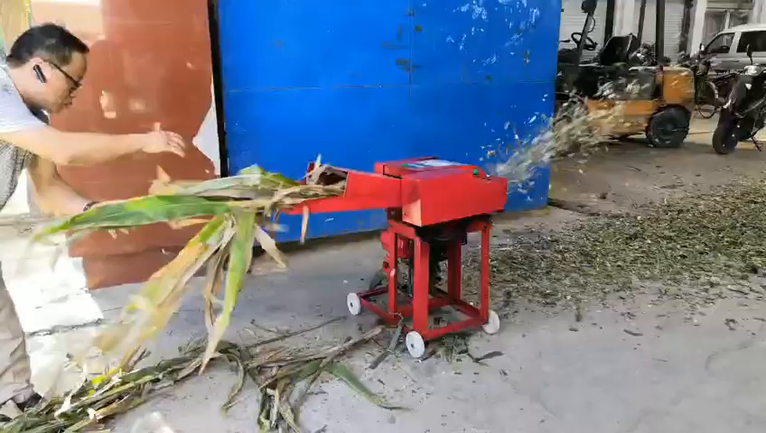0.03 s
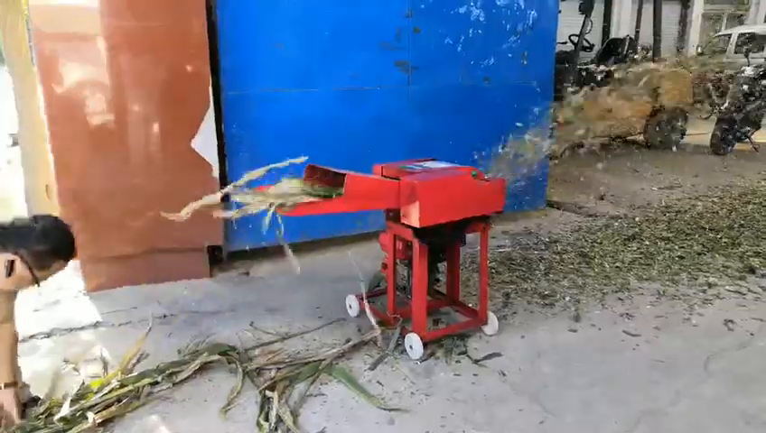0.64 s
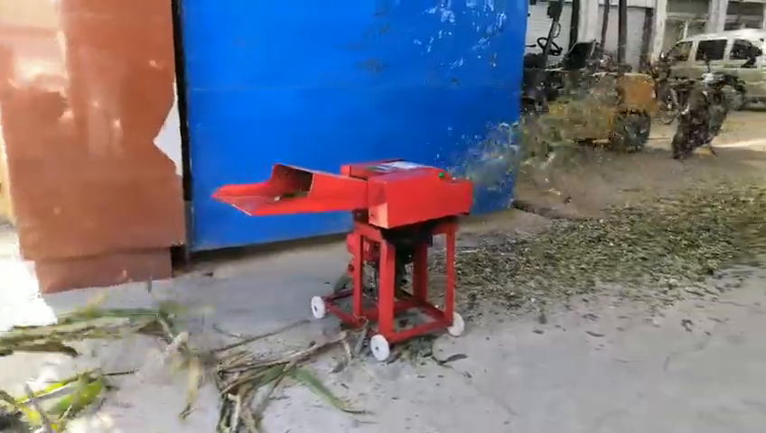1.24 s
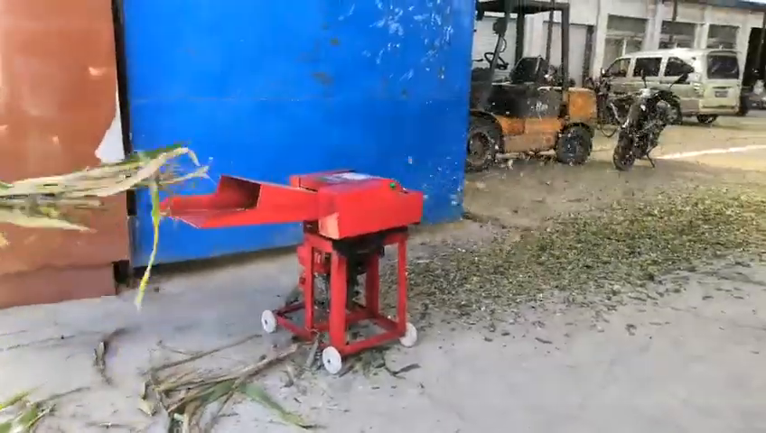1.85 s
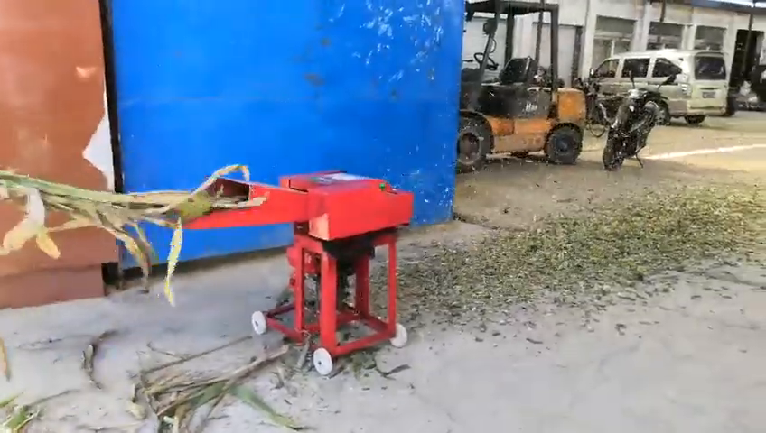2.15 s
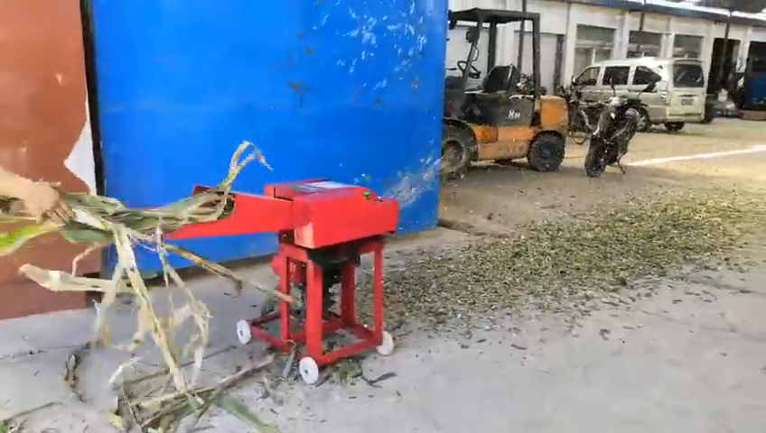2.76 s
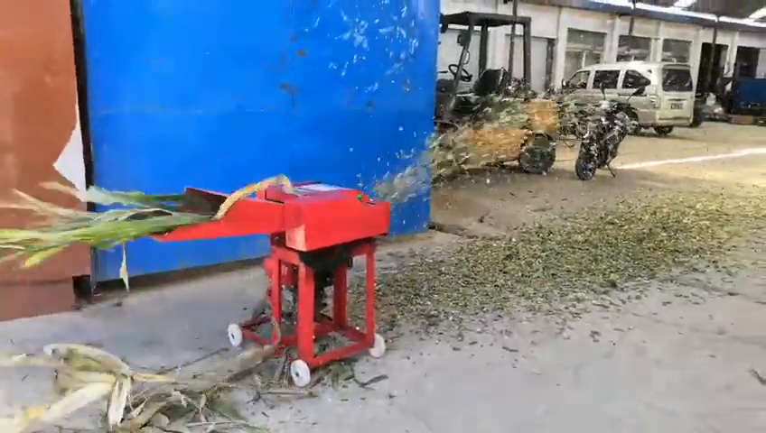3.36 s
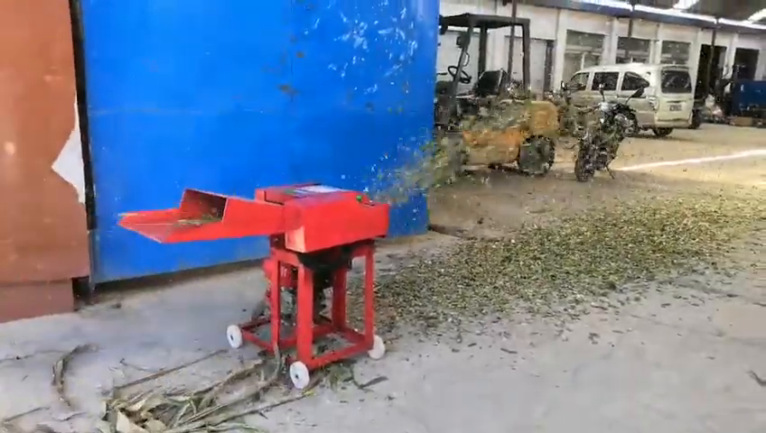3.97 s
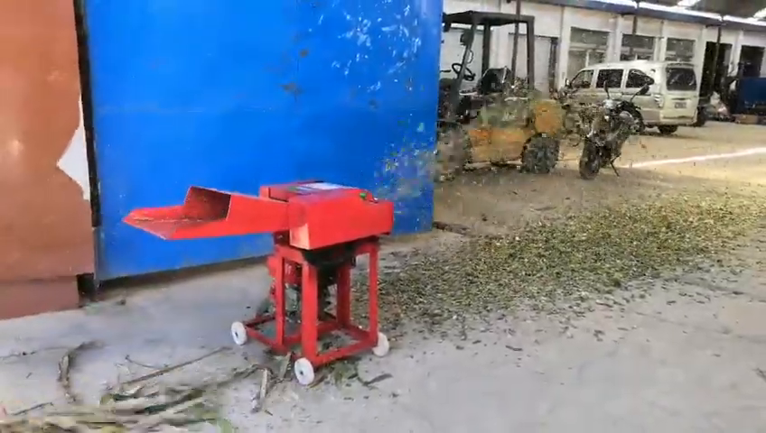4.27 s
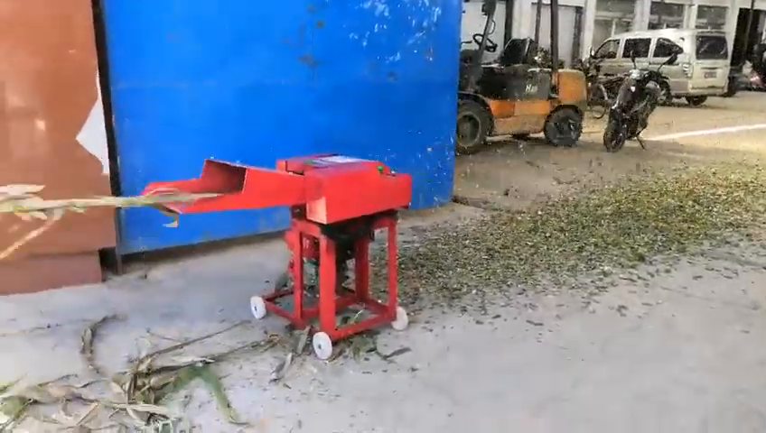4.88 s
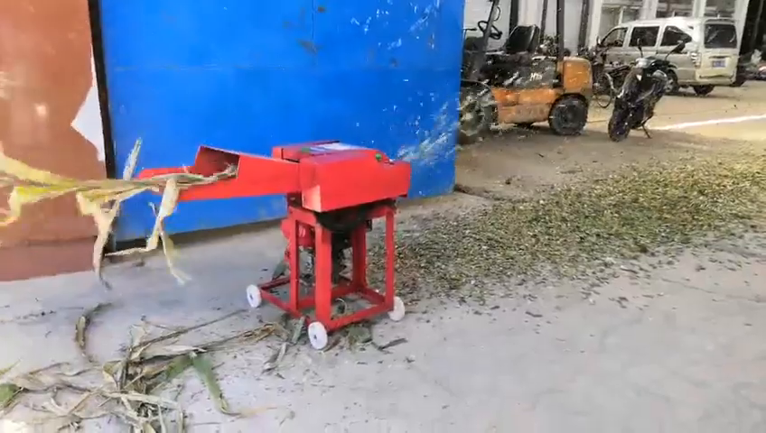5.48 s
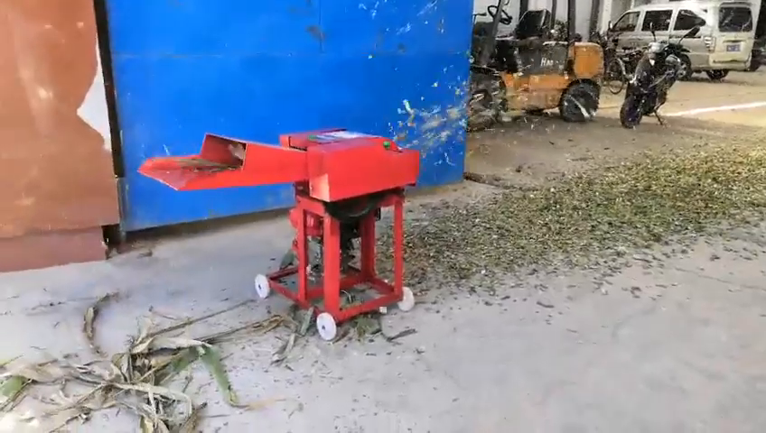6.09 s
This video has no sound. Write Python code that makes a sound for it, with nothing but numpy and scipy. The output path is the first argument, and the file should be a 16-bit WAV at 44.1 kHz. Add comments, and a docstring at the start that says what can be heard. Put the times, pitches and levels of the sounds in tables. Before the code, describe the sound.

A small motorised chaff cutter runs close by in a paved yard, its motor throbbing and its steel housing droning and clattering. Three bundles of maize stalks go through in turn. Each brings a buzzing roar of fast chopping, with woody cracks, knocks and a hiss of flying chaff, while the motor sags slightly. Between bundles the machine eases back to its empty drone.

```python
"""A small motorised chaff cutter in a paved yard, close on a two-port stereo microphone.
Three bundles of maize stalks go in. The belt-driven knives chop about eighty times a second,
whining in leafy tops and groaning in thick ends, while stalks split and hard pieces knock.
Chaff sprays hissing out of the steel chute, and the motor throbs and sags under each bundle.
Behind it all the steel housing drones and clatters, even when the cutter runs empty."""
import sys
import numpy as np
from scipy import signal
from scipy.fft import rfft, irfft
from scipy.io import wavfile
from scipy.ndimage import uniform_filter1d

SR = 44100
rng = np.random.default_rng(int(sys.argv[2]) if len(sys.argv) > 2 else 0)


def wav_out(sig):
    """Save sig, one row per channel (or a flat mono array), as 16-bit PCM at SR to the path in sys.argv[1]."""
    wavfile.write(sys.argv[1], SR, np.round(np.clip(np.atleast_2d(sig).T, -1, 1) * 32767).astype(np.int16))


N = 270333
T = np.arange(N) / SR
BINS_HZ = np.maximum(np.fft.rfftfreq(N, 1 / SR), 1)

# bundles going in; the short ones are leaf tips or an extra burst of chaff hiss within a bundle:
# start_s, length_s, chop_db, spray_db
BUNDLES = [(0.168, 0.79, -19.5, -23.5), (1.997, 0.19, -30, -27.5), (2.542, 1.22, -21, -26.5),
           (2.64, 0.38, -30, -26), (3.983, 0.17, -35, -28), (4.995, 0.77, -25, -25.5),
           (5.827, 0.24, -28, -26)]
# speed of the knives: time_s, cuts_per_s
CUT_RATE = [(0.32, 77.9), (0.48, 78.3), (0.6, 80), (0.78, 81), (1.15, 81.6), (2.0, 81.4), (2.35, 82.1),
            (2.55, 81.4), (2.74, 76.9), (2.92, 79.1), (3.27, 78.8), (3.55, 80.4), (3.8, 81.2), (4.08, 81.1),
            (4.35, 82.5), (5.0, 81.2), (5.7, 81.2), (6.13, 82)]
# leafy tops cut cleanly, hard ends shatter: time_s, cleanness (0-1)
CLEAN_CUT = [(0.32, .65), (0.6, .9), (1.15, .9), (1.4, .4), (2.7, .6), (3.2, .55), (3.5, .9), (4.1, .9),
             (4.4, .35), (6.1, .55)]
# roar of the chopping: frequency_hz, level_db
CHOP_SPECTRUM = [(350, -57), (560, -3), (800, -2), (950, 4), (1200, 1), (1500, 3.5), (2100, 6.5),
                 (2800, -1.5), (3600, -4.5), (5200, -23), (7000, -23), (14000, -47)]
# stalks lying solidly under the knives, so that the cuts buzz: start_s, length_s, level_db
GRIPS = [(0.28, 0.27, -19), (0.76, 0.11, -23.5), (2.7, 0.24, -24.5), (3.16, 0.36, -25), (3.64, 0.18, -19),
         (3.86, 0.2, -26.5)]
# that low buzz: multiple of the cut rate, level_db
BUZZ_ORDERS = [(2, -16), (3, -4.5), (4, 0)]
# leafy tops and thick ends passing the knives: start_s, length_s, level_db
LEAFY_TOPS = [(0.5, 0.6, -35), (2.03, 0.35, -43), (3.33, 0.7, -35.5)]
THICK_ENDS = [(0.25, 0.28, -36), (2.64, 0.62, -35), (5.08, 0.7, -43)]
# the whine in the tops and the groan in the ends: frequency_hz, level_db
WHINE_SPECTRUM = [(400, 0), (480, -1), (560, -1), (645, -5), (730, -5), (800, -5), (890, -8), (970, -4),
                  (1050, -9), (1220, -8), (1300, -0.5), (1400, -9)]
GROAN_SPECTRUM = [(400, -14), (560, -8), (630, -3), (705, 0), (790, -1.5), (870, -9), (1020, -3),
                  (1100, -3), (1180, 0), (1260, -8), (1450, -10)]
# knots in the stalks: time_s, level_db
KNOTS = [(0.78, -23), (2.72, -20.5), (3.19, -21), (3.41, -24), (3.52, -20.5), (3.68, -19), (3.86, -21.5),
         (5.15, -19), (5.24, -20), (5.48, -24), (5.56, -21), (5.71, -19)]
# their rasp: frequency_hz, level_db
RASP_SPECTRUM = [(500, -29), (1100, -1), (1550, 2), (1850, 0), (2250, 8), (2600, -5), (3600, -9),
                 (6000, -42), (12000, -53)]
# thick stalks splitting: start_s, length_s, level_db
SPLITS = [(0.39, 0.071, -34), (1.724, 0.015, -30), (2.355, 0.015, -29), (2.512, 0.022, -26.5),
          (2.67, 0.18, -30), (2.712, 0.025, -20.5), (2.835, 0.035, -30), (2.92, 0.17, -24.5),
          (3.18, 0.053, -31), (3.53, 0.022, -24), (3.586, 0.014, -29), (3.643, 0.018, -30),
          (4.139, 0.014, -32), (4.464, 0.014, -31), (4.66, 0.02, -32), (4.759, 0.013, -32),
          (4.903, 0.014, -32), (5.155, 0.044, -23.5), (5.23, 0.033, -31), (5.336, 0.011, -25),
          (5.56, 0.04, -27), (5.685, 0.094, -27), (5.901, 0.015, -27)]
# resonances of a hollow stalk: pitch_hz, width_hz, level_db
STALK_MODES = [(820, 110, -2), (1170, 200, 1), (2750, 700, 4), (3750, 800, 4), (5300, 1100, -2)]
# hard pieces hitting the housing: start_s, level_db, pitch_hz
KNOCKS = [(2.742, -22, 1150), (2.848, -21, 1140), (3.008, -23.5, 1140), (3.203, -25, 800),
          (3.457, -25.5, 820), (4.065, -25, 1290), (4.118, -28, 780), (4.503, -25.5, 760),
          (5.191, -25, 1200), (5.244, -27, 800), (5.5, -25, 980)]
# hiss of flying chaff: frequency_hz, level_db
SPRAY_SPECTRUM = [(1500, 10), (3000, 5), (5000, 6.5), (6400, -0.5), (7500, 1.5), (8300, -3), (9300, 2.5),
                  (10200, 1), (11500, -9), (13000, -12), (15000, -28)]
# peaks and notches of the chute: centre_hz, width_hz, gain_db
CHUTE_BANDS = [(1830, 160, 1), (2700, 150, 1.5), (3000, 140, 2), (3280, 250, -2), (3780, 250, 2),
               (4030, 120, -1.5), (4420, 250, -2.5), (5050, 200, 1), (5800, 280, 4), (7550, 400, 1.5),
               (8200, 300, -2)]
# motor speed, sagging under the bundles: time_s, cycles_per_s
MOTOR_SPEED = [(0.32, 28.42), (0.48, 28.58), (0.75, 29.32), (1.52, 29.57), (1.92, 29.29), (2.43, 29.65),
               (2.74, 28.24), (2.96, 28.85), (3.27, 28.72), (3.75, 29.43), (4.02, 29.26), (4.41, 29.83),
               (5.04, 29.09), (5.19, 29.33), (6.13, 29.5)]
# throb of the motor and shake of its frame: multiple of the cycle rate, level_db
THROB_ORDERS = [(5, -6.5), (6, 1), (7, -17), (8, -41), (9, -12.5), (10, -12), (11, -11), (12, -17.5),
                (13, -46)]
SHAKE_ORDERS = [(1, -19), (2, -1), (3, -11.5), (4, -49), (7, 0)]
# drone of the housing: frequency_hz, level_db
DRONE_SPECTRUM = [(25, -30), (90, -15), (120, -27), (160, 0), (215, -19), (240, 3.5), (262, 3), (278, -3.5),
                  (300, 6.5), (335, 1.5), (358, -6), (390, -13.5), (500, -25), (900, -76)]
# the drone swells briefly: time_s, level_db
DRONE_SWELLS = [(0.5, -24), (1.31, -19), (1.64, -19), (1.98, -19), (2.5, -27), (3.74, -39), (4.35, -25),
                (4.5, -19.5), (4.86, -21.5), (5.08, -22), (5.68, -19.5), (6.06, -21)]
# the drone dips briefly: time_s
DRONE_LULLS = [0.69, 1.16, 3.58, 4.24, 5.29, 5.47, 5.9]
# ringing steel panels: pitch_hz, width_hz, level_db
PANEL_MODES = [(407, 14, -16), (648, 18, -8), (797, 30, -4.5), (1100, 24, -4), (1178, 30, 0),
               (1297, 28, -1.5), (1625, 30, -6), (1690, 35, -4), (1780, 40, -3), (1875, 55, -1.5),
               (2010, 50, -1.5), (2120, 45, -1.5), (2290, 60, -4), (3030, 70, -9)]
# rattle of gears and feed rollers: frequency_hz, level_db
CLATTER_SPECTRUM = [(300, 4), (420, -3.5), (700, -0.5), (1200, 0), (2000, 1.5), (2600, -3.5), (3300, -7),
                    (5000, -11), (6300, -19), (8200, -22), (9800, -18), (11500, -31.5), (15000, -52)]
# thin steel ring, relative to that rattle: time_s, level_db
RING_LEVEL = [(0.4, -21), (0.9, -27), (1.3, -19), (1.9, -24), (2.9, -16), (3.9, -27), (4.3, -18.5),
              (5.0, -19.5), (5.6, -14), (6.1, -22)]
# the two microphone ports: frequency_hz, likeness (0-1), left_lead_rad, left_minus_right_db
MIC_PORTS = [(58, 0.9, -0.12, 0), (177, 0.93, -0.62, 0), (333, 0.54, -0.46, 0), (466, 0.98, -1.1, -1.5),
             (500, 1, -1.72, -2.5), (775, 0.05, 0.52, 2), (1300, 0.88, 0.37, 0), (1600, 0.43, 0.74, -3),
             (2280, 0.52, 1.5, 2), (3650, 0.17, 1.13, 1.5), (6540, 0, 0.8, -2.5), (9160, 0.01, -0.28, -1),
             (10400, 0, -0.17, 8), (14000, .02, 0, 0)]

EMPTY_CHOP_DB, EMPTY_SPRAY_DB = -27, -36.5   # scraps left whirling in the housing
FULL_LOAD_DB, FULL_BUZZ_DB = -17.5, -13   # chopping and buzz levels that count as full load
SPRAY_LINGER = 1.335   # chaff flies for this many times a bundle's length


def chopping(cuts, panel_db=-2.5):
    """The cutting roars in the housing and sets its panels ringing."""
    cleanness, = in_time(CLEAN_CUT)
    roar = colour(knife_hits(cuts, cleanness), CHOP_SPECTRUM)
    return roar + from_db(panel_db) * resonances(knife_hits(cuts, cleanness), PANEL_MODES)


def knife_hits(cuts, cleanness):
    """Each knife cracks through the stalks and pieces tumble in between."""
    cracks = strokes(cuts, decay_turns=.49, uneven_db=1) * rng.standard_normal((2, N))
    tumble = impacts(per_s=1100, spread_db=1, ring_s=.0015)
    return cleanness * cracks + np.sqrt(1 - cleanness ** 2) * tumble


def feeding(bite_s=.092):
    """Each bundle is drawn in, tapers and runs out: gains of the chopping, spray and buzz."""
    cutting = [(start, length, db) for start, length, db, _ in BUNDLES]
    flying = [(start, length * SPRAY_LINGER, db) for start, length, _, db in BUNDLES]
    chop = held_power(cutting, bite_s, release_db_per_s=21, thinning_db_per_s=3.5)
    chop += from_db(EMPTY_CHOP_DB) ** 2
    chaff = held_power(flying, bite_s, release_db_per_s=58, thinning_db_per_s=.5)
    chaff += from_db(EMPTY_SPRAY_DB) ** 2
    buzz = held_power(GRIPS, attack_s=.042, release_db_per_s=90) + chop * from_db(-12) ** 2
    return np.sqrt([chop, chaff, buzz])


def knife_buzz(cuts, orders):
    """Evenly spaced cuts shake the housing at multiples of their rate, each wavering a little."""
    phase = 2 * np.pi * (cuts + .0012 * drift(14))
    out = 0
    for k, gain in orders:
        waver = from_db(min(.2 * k, 2.5) * drift(4))
        out += gain * waver * np.sqrt(2) * np.cos(k * phase + rng.uniform(0, 2 * np.pi))
    return out


def knife_strain(cuts, cut_rate, events, spectrum, panel_lift=.69):
    """Whine or groan: upper multiples of the cut rate light up as they cross a panel's resonance."""
    points_hz, points_db = np.transpose(spectrum)
    orders = []
    for k in range(5, 19):
        hz = k * cut_rate
        gain = from_db(np.interp(np.log(hz), np.log(points_hz), points_db))
        ringing = sum(1 / (1 + (2 * (hz - centre) / width) ** 2) for centre, width, _ in PANEL_MODES)
        orders.append((k, gain * (1 + panel_lift * ringing)))
    envelope = np.sqrt(held_power(events, attack_s=.08, release_db_per_s=50))
    return envelope * knife_buzz(cuts, orders)


def knot_rasp(cuts):
    """Tough knots rasp briefly against the knives."""
    envelope = np.sqrt(swell_power(KNOTS, width_s=.044))
    return envelope * colour(knife_hits(cuts, cleanness=.5), RASP_SPECTRUM)


def stalk_crunch(cuts):
    """Hollow stalks split with a bright, woody crackle."""
    envelope = np.sqrt(held_power(SPLITS, attack_s=.0033, release_db_per_s=130))
    return envelope * resonances(knife_hits(cuts, cleanness=.33), STALK_MODES)


def knocks(rise_s=.011, reach_octaves=.35):
    """A hard piece tumbles against the housing and rings the panels nearest its own pitch."""
    hz, _, panel_db = np.transpose(PANEL_MODES)
    age = np.arange(SR // 6) / SR
    envelope = age / rise_s * np.exp(1 - age / rise_s)
    out = np.zeros(N + SR)
    for start_s, level_db, pitch_hz in KNOCKS:
        gains = from_db(panel_db) * np.exp(-(np.log2(hz / pitch_hz) / reach_octaves) ** 2)
        tones = np.sin(2 * np.pi * (hz[:, None] * age + rng.random((len(hz), 1))))
        start = int(start_s * SR)
        out[start:start + len(age)] += from_db(level_db) * envelope * rms_one(gains @ tones)
    return out[:N]


def chip_ping(start_s=4.35, pitch_hz=4190, level_db=-22.5, decay_s=.014):
    """One hard chip strikes a steel part with a clear ping."""
    age = np.maximum(T - start_s, 0)
    return from_db(level_db) * np.sin(2 * np.pi * pitch_hz * age) * np.exp(-age / decay_s)


def chaff_spray(cuts):
    """Chips tick against the chute by the thousand, in a puff after each cut."""
    chips = impacts(per_s=1900, spread_db=5, ring_s=.013)
    puffs = np.exp(.16 * strokes(cuts, decay_turns=.58, uneven_db=1.5))
    return colour(chips * puffs, SPRAY_SPECTRUM)


def motor(cycles, orders, uneven_db, crest_turns=.5894):
    """The motor's harmonics swell together once a cycle; the upper ones waver most."""
    phase = 2 * np.pi * (cycles - crest_turns + .003 * drift(22))
    out = 0
    for k, db in orders:
        lag = .16 * (k - 6) ** 2   # away from the main resonance they fall out of step: a rounder throb
        out -= from_db(db + uneven_db * k * drift(7.4)) * np.cos(k * phase - lag)
    return rms_one(out)


def motor_throb(cycles, chop_gain, buzz_gain, recovery_s=.14):
    """The throb eases under a firm cut and under load, which lingers just after a bundle."""
    empty, full = from_db([EMPTY_CHOP_DB, FULL_LOAD_DB])
    load = (chop_gain - empty) / (full - empty)
    load = np.maximum(load, np.interp(T - recovery_s, T, load))
    firmness = (buzz_gain / from_db(FULL_BUZZ_DB)) ** 2
    level_db = -16 - 6.5 * load - 8.5 * firmness
    return from_db(level_db) * motor(cycles, THROB_ORDERS, uneven_db=.11)


def housing_drone(cycles, crest_turns=.4, lull_db=-3, lull_width_s=.041):
    """The steel box drones roughly, pulses with the motor, and now and then swells or dips."""
    base_power = from_db(-22.5 + .3 * drift(4.5)) ** 2
    dips_db = lull_db * sum(np.exp(-((T - s) / lull_width_s) ** 2) for s in DRONE_LULLS)
    envelope = from_db(dips_db) * np.sqrt(base_power + swell_power(DRONE_SWELLS, width_s=.097))
    rough = colour(impacts(per_s=490, spread_db=1.5, ring_s=.0033), DRONE_SPECTRUM)
    levelled = rough / np.sqrt(uniform_filter1d(rough ** 2, size=SR // 7) + 1e-9)
    pulse = 1 + .38 * np.cos(2 * np.pi * (cycles - crest_turns))
    return envelope * rms_one(levelled * pulse)


def gear_clatter(cycles):
    """Gears and feed rollers rattle and stir the panels; one steel part is tapped and rings."""
    rattle = impacts(per_s=1200, spread_db=2, ring_s=.006) * (1 + .015 * np.cos(2 * np.pi * cycles))
    panels = resonances(impacts(per_s=720, spread_db=4, ring_s=.0026), PANEL_MODES)
    ring = resonate(impacts(per_s=150, spread_db=1.5, ring_s=.004), hz=4192, width_hz=42)
    ring_db, = in_time(RING_LEVEL)
    return colour(rattle, CLATTER_SPECTRUM) + from_db(-9) * panels + from_db(ring_db) * ring


def chute(x):
    """The noise leaves through the steel chute, which adds its own peaks and notches."""
    bands = sum((from_db(db) - 1) / (1 + 2j * (BINS_HZ - hz) / width) for hz, width, db in CHUTE_BANDS)
    return irfft(rfft(x) * (1 + bands), N)


def microphone(direct, scattered):
    """Direct sound is common to both ports; scattered sound differs between them, most in the treble."""
    likeness, lead_rad, balance_db = in_frequency(MIC_PORTS)
    sides = np.array([[1], [-1]])
    mid, side = rfft(scattered)
    pair = rfft(direct) + np.sqrt((1 + likeness) / 2) * mid + sides * np.sqrt((1 - likeness) / 2) * side
    return irfft(pair * from_db(sides * balance_db / 2) * np.exp(.5j * sides * lead_rad), N)


def impacts(per_s, spread_db, ring_s):
    """Random hits of uneven size, each a short scatter of reflections, along two paths; rms 1."""
    sizes = from_db(spread_db * np.minimum(rng.exponential(1, N), 4))
    hits = (rng.random(N) < per_s / SR) * sizes
    energy = signal.lfilter([1], [1, -np.exp(-1 / (ring_s * SR))], hits ** 2 + 1e-18)
    return rms_one(np.sqrt(energy) * rng.standard_normal((2, N)))


def strokes(turns, decay_turns, uneven_db):
    """A sharp rise and a decay once a turn, no two equally strong; rms 1."""
    strength = from_db(uneven_db * rng.standard_normal(1000))
    return rms_one(strength[turns.astype(int)] * np.exp(-(turns % 1) / decay_turns))


def held_power(events, attack_s, release_db_per_s, thinning_db_per_s=0):
    """Summed power of events that rise, hold while thinning, and die away."""
    power = 0
    for start_s, length_s, level_db in events:
        age = T - start_s
        thinned_db = thinning_db_per_s * np.clip(age, 0, length_s)
        released_db = release_db_per_s * np.maximum(age - length_s, 0)
        power += (np.clip(age / attack_s, 0, 1) * from_db(level_db - thinned_db - released_db)) ** 2
    return power


def swell_power(events, width_s):
    """Summed power of short rounded swells."""
    return sum(from_db(db) ** 2 * np.exp(-((T - s) / width_s) ** 2) for s, db in events)


def resonate(x, hz, width_hz):
    """One ringing resonance; rms 1."""
    r = np.exp(-np.pi * width_hz / SR)
    return rms_one(signal.lfilter([1, 0, -1], [1, -2 * r * np.cos(2 * np.pi * hz / SR), r * r], x))


def resonances(x, modes):
    """A body with several resonances; rms 1."""
    return rms_one(sum(from_db(db) * resonate(x, hz, width) for hz, width, db in modes))


def colour(x, spectrum):
    """Give x a spectrum that falls away below its first point; rms 1."""
    skirt = np.minimum(BINS_HZ / spectrum[0][0], 1) ** 2
    return rms_one(irfft(rfft(x) * from_db(in_frequency(spectrum)[0]) * skirt, N))


def drift(rate_hz):
    """Smooth random wander up to about rate_hz; rms 1."""
    return rms_one(irfft(rfft(rng.standard_normal(N)) / (1 + (BINS_HZ / rate_hz) ** 4), N))


def in_time(rows):
    """Each column of a curve table at every sample."""
    time_s, *columns = np.transpose(rows)
    return [np.interp(T, time_s, column) for column in columns]


def in_frequency(rows):
    """Each column of a spectrum table at every frequency."""
    hz, *columns = np.transpose(rows)
    return [np.interp(np.log(BINS_HZ), np.log(hz), column) for column in columns]


def from_db(db):
    """Decibels to gain."""
    return 10 ** (np.asarray(db) / 20)


def rms_one(x):
    """Scale to rms 1."""
    return x / np.sqrt(np.mean(x ** 2) + 1e-20)


def scene():
    """The cutter at the microphone; the belt slips a little, so motor and knives each have a speed."""
    speed, = in_time(MOTOR_SPEED)
    cut_rate, = in_time(CUT_RATE)
    cycles, cuts = np.cumsum(speed) / SR, np.cumsum(cut_rate) / SR
    chop_gain, spray_gain, buzz_gain = feeding()
    throb = motor_throb(cycles, chop_gain, buzz_gain)
    shake = from_db(-30) * motor(cycles, SHAKE_ORDERS, uneven_db=.6)   # as strong whatever the load
    buzz = buzz_gain * knife_buzz(cuts, [(k, from_db(db)) for k, db in BUZZ_ORDERS])
    whine = knife_strain(cuts, cut_rate, LEAFY_TOPS, WHINE_SPECTRUM)
    groan = knife_strain(cuts, cut_rate, THICK_ENDS, GROAN_SPECTRUM)
    machine = housing_drone(cycles) + from_db(-19.5) * gear_clatter(cycles)
    stalks = chop_gain * chopping(cuts) + knot_rasp(cuts) + stalk_crunch(cuts)
    chaff = spray_gain * chaff_spray(cuts)
    direct = throb + shake + buzz + whine + groan + knocks() + chip_ping()
    return microphone(direct, scattered=chute(machine + stalks + chaff))


def record(dry, start_s=.32, ceiling=.92, cutoff_hz=14850):
    """The sound cuts in abruptly; the highest peaks are rounded and the top treble is cut."""
    opened = dry * np.clip((T - start_s) / .003, 0, 1)
    rounded = opened / (1 + (opened / ceiling) ** 8) ** (1 / 8)
    return signal.sosfilt(signal.ellip(10, .2, 80, cutoff_hz, fs=SR, output="sos"), rounded)


dry = scene()
out = record(dry)
wav_out(out)
```